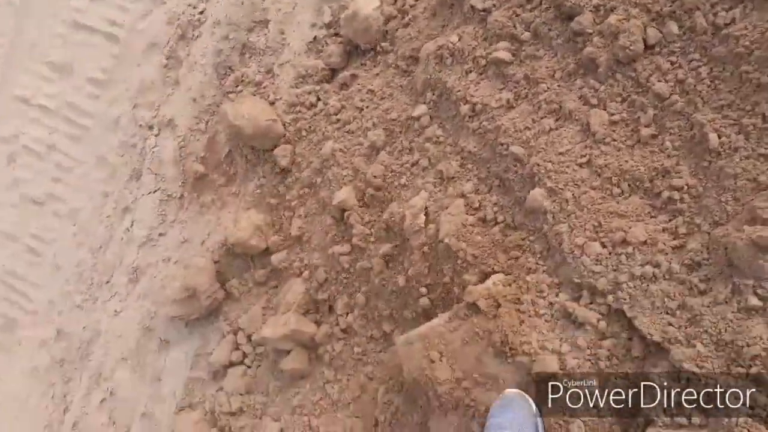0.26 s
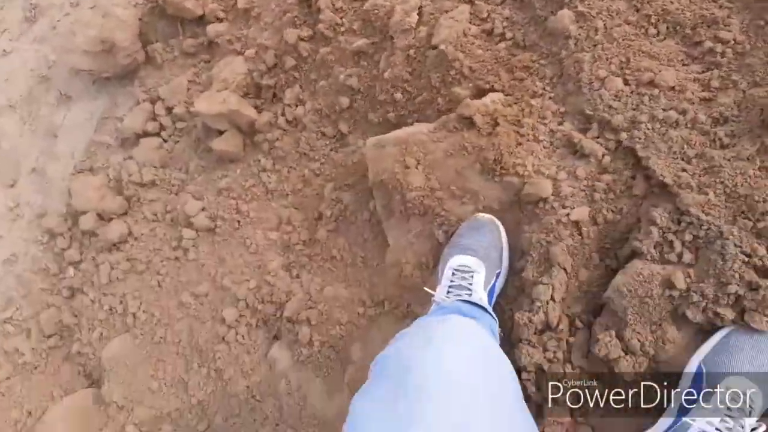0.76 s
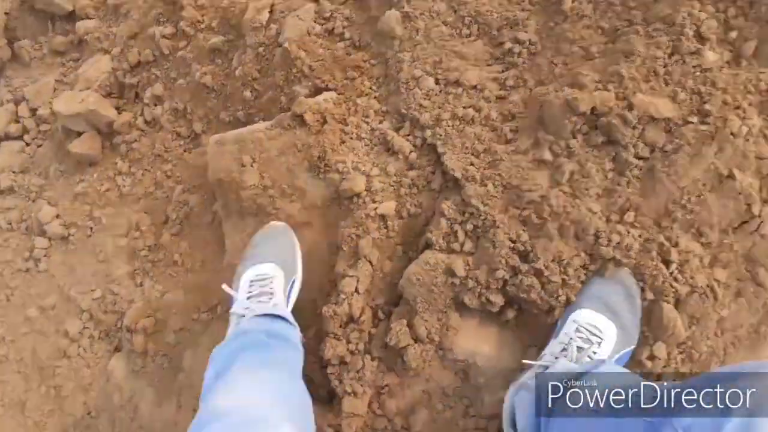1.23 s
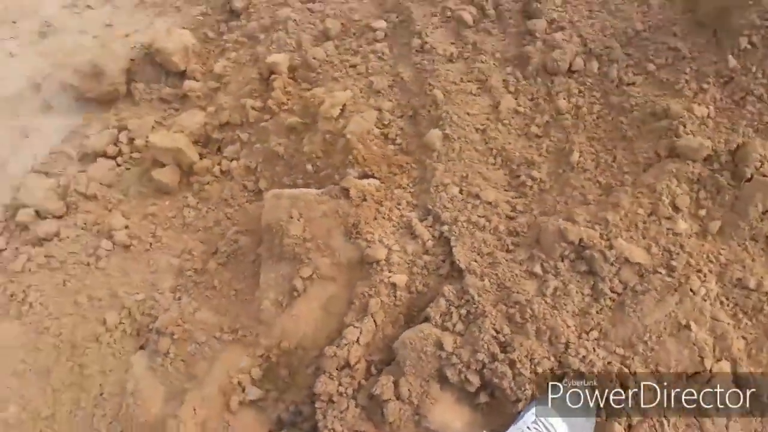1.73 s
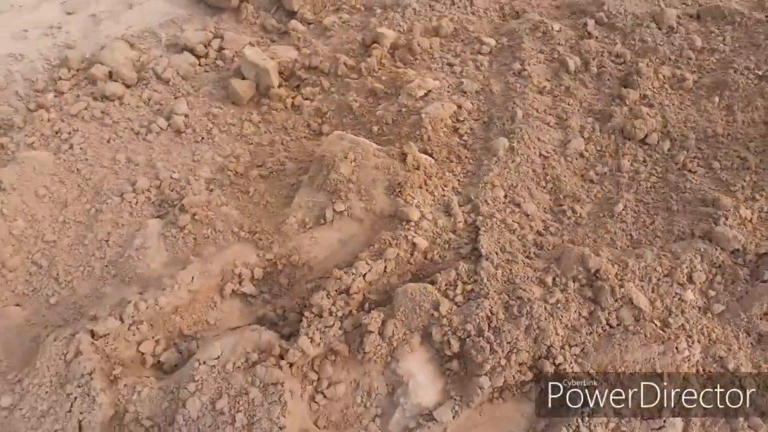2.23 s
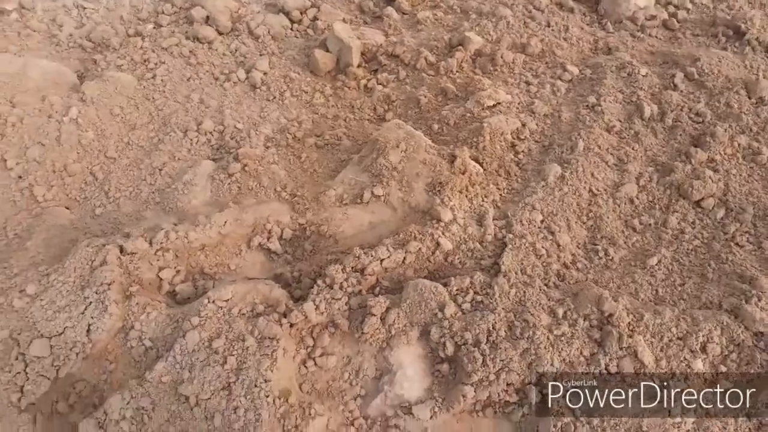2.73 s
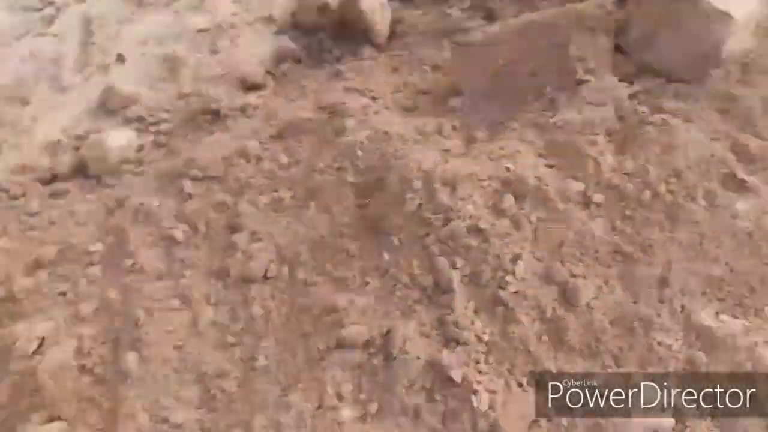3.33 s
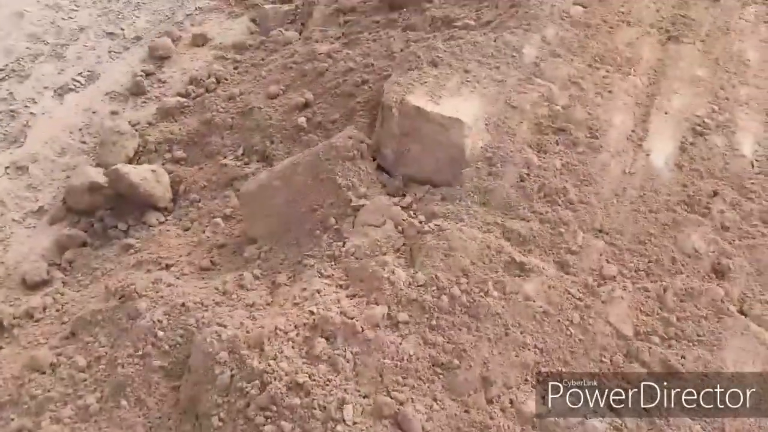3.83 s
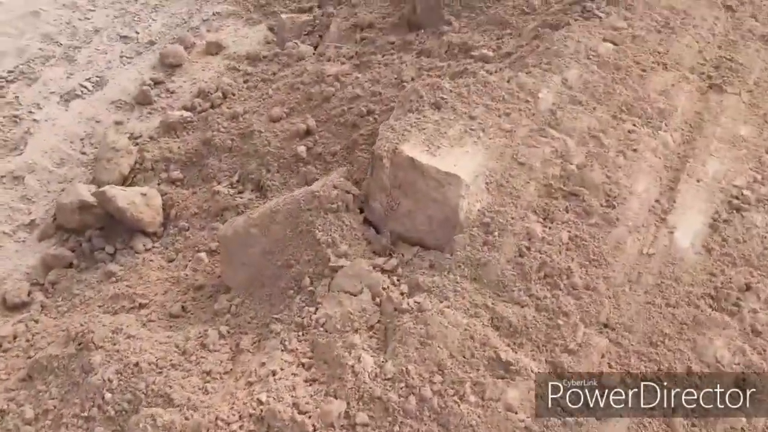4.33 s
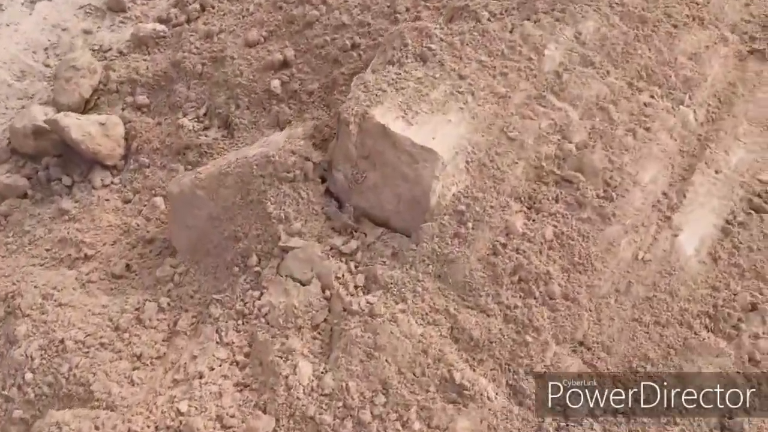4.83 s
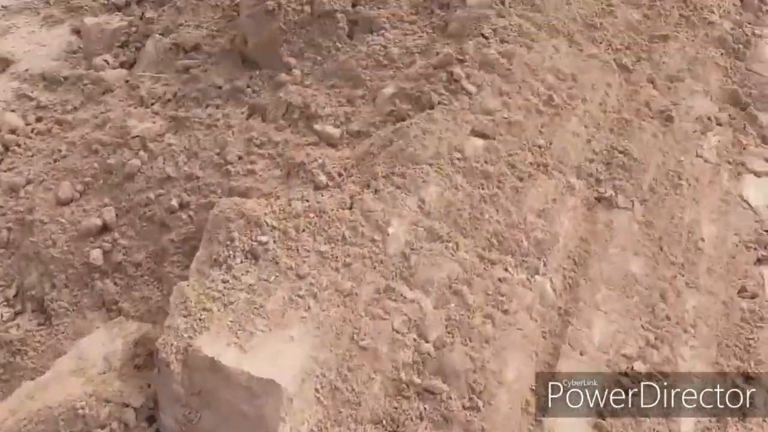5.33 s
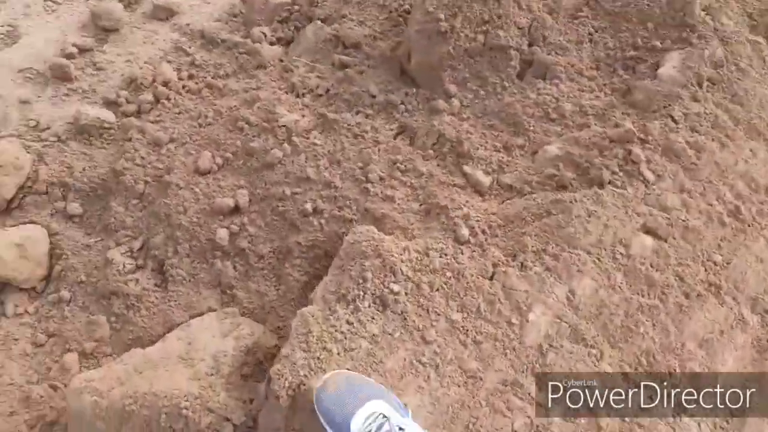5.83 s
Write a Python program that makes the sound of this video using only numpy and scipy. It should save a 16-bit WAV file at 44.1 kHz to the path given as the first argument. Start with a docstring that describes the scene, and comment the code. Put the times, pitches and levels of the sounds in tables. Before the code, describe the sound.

Outdoors, someone picks their way over loose, lumpy earth. Uneven soft steps crush clods with dull crunches, grit grinds and sand trickles off the shoes. Faint birdlike chirps rise in the distance, busiest at first. Wind buffets a handheld stereo microphone with low flutter, and a sharper crunchy step near five seconds leads into heavy wind thumps.

```python
"""Hiss and buffeting wind run throughout, with faint, mostly rising chirps and a trickle of sand,
while someone picks their way over loose, lumpy soil: each sole crushes clods with a dull crunch.
Crunch and grit are ringing grains, sand and hiss are coloured noise, and chirps are gliding husky whistles.
Gusts rumble and thump on the two microphone ports, a few clicks lie close by, and clods crack."""
import sys
import numpy as np
from scipy import signal
from scipy.fft import rfft, irfft, next_fast_len
from scipy.io import wavfile
from scipy.ndimage import uniform_filter1d

SR = 44100
rng = np.random.default_rng(int(sys.argv[2]) if len(sys.argv) > 2 else 0)


def unload_audio(sound):
    """Save the sound as a 16-bit wav file, at the path given as the first command line argument."""
    columns = np.transpose(np.atleast_2d(sound))
    # keep every value between -1 and 1, then stretch to whole-number steps
    steps = np.round(np.clip(columns, -1, 1) * 32767)
    wavfile.write(sys.argv[1], SR, steps.astype(np.int16))


N = 267629
TIME = np.arange(N) / SR


def from_db(db):
    """Decibels to gain."""
    return 10 ** (np.asarray(db) / 20)


def rms_one(x):
    """Scale to unit rms."""
    return x / np.sqrt(np.mean(x ** 2) + 1e-20)


def evened(x, window_s):
    """Hold the short-term rms near one."""
    window = int(window_s * SR)
    power = uniform_filter1d(x ** 2, window)
    power = uniform_filter1d(power, int(window_s * SR / 2))
    return x / np.sqrt(power + 1e-12)


def in_time(rows):
    """Each column of a curve at every sample."""
    s, *columns = np.transpose(rows)
    return [np.interp(TIME, s, column) for column in columns]


def swell(start_s, length_s, attack_s, release_s):
    """Smooth attack up to the start, a hold, then an exponential release."""
    before = np.minimum(TIME - start_s, 0) / attack_s
    after = np.maximum(TIME - start_s - length_s, 0) / release_s
    return np.exp(-before ** 2 / 2 - after)


def panned(pan_db):
    """Left and right gains, pan_db apart, whose mean is one."""
    gains = from_db(np.array([[pan_db], [-pan_db]]) / 2)
    return gains / gains.mean()


def colour(x, spectrum):
    """Filter by a spectrum of (freq_hz, level_db) points, falling away beyond both ends."""
    hz, level_db = np.transpose(spectrum)
    size = next_fast_len(N)
    log_hz = np.log(np.maximum(np.fft.rfftfreq(size, 1 / SR), 1))
    beyond = np.maximum(np.log(hz[0]) - log_hz, 0) + np.maximum(log_hz - np.log(hz[-1]), 0)
    gain = from_db(np.interp(log_hz, np.log(hz), level_db) - 20 * beyond)
    return irfft(rfft(x, size) * gain, size)[..., :N]


def drift(rate_hz):
    """Slow random wander with unit rms: noise at 400 points a second through two equal poles."""
    points_per_s = 400
    points = rng.standard_normal(int(N / SR * points_per_s) + 2)
    r = np.exp(-2 * np.pi * rate_hz / points_per_s)
    slow = signal.lfilter([1], [1, -2 * r, r * r], points)
    return np.interp(TIME * points_per_s, np.arange(len(slow)), rms_one(slow))


def grains(per_s, spread_db):
    """Random clicks: a positive spread makes a few large ones, a negative one a few small."""
    sizes = from_db(spread_db * np.minimum(rng.exponential(1, N), 4))
    signs = rng.choice([-1, 1], N)
    return rms_one(sizes * signs * (rng.random(N) < per_s / SR))


def ring(clicks, hz, t60_s):
    """A two-pole resonator: a unit click starts a decaying sine of height one."""
    r, w = from_db(-60 / (t60_s * SR)), 2 * np.pi * hz / SR
    return signal.lfilter([0, np.sin(w)], [1, -2 * r * np.cos(w), r * r], clicks + 1e-18)


def scattered(x, t60_s):
    """Rough ground returns a short diffuse tail, different at each port."""
    age = np.arange(int(t60_s * SR)) / SR
    tail = rng.standard_normal((2, len(age))) * from_db(-60 * age / t60_s)
    return signal.fftconvolve(x, tail / np.sqrt(np.sum(tail ** 2) / 2), axes=1)[:, :N]


# steady hiss at each port: (freq_hz, level_db per Hz)
HISS_LEFT = [(60, -104), (200, -91), (380, -104), (750, -108), (1500, -108), (2500, -112), (4000, -114),
             (6500, -124), (8300, -130), (15000, -130)]
HISS_RIGHT = [(60, -112), (200, -103), (380, -105.5), (750, -107), (1500, -110), (2300, -104), (3200, -105),
              (4200, -101), (6600, -101), (7600, -112), (8400, -126), (15000, -130)]
# extra bright hiss on the right, before its level curve: (freq_hz, level_db per Hz)
BRIGHT_HISS = [(1700, -122), (2350, -103), (2900, -116), (3500, -116), (3900, -102), (4300, -87.5),
               (4750, -89.5), (5200, -91), (6000, -100), (6800, -106), (8000, -130)]
# fader for the bright hiss: (time_s, level_db)
BRIGHT_HISS_LEVEL = [(5.39, -60), (5.41, -2.5), (5.53, -1), (5.61, -3.5), (5.75, -2.5), (5.82, -2.5),
                     (6.06, -1)]
# brief dips in the treble: (time_s, half_width_s, depth_db)
HISS_DIPS = [(0.78, 0.034, 11), (2.78, 0.073, 4.5), (3.4, 0.071, 2.5), (3.93, 0.062, 4.5)]


def air(dip_above_hz=3000):
    """Steady noise hiss that brightens on the right late on; its treble dips briefly now and then."""
    white = rng.standard_normal((3, N)) * np.sqrt(SR / 2)
    opened = from_db(in_time(BRIGHT_HISS_LEVEL)[0])
    flicker = rms_one(from_db(1.3 * drift(rate_hz=30)))
    left = colour(white[0], HISS_LEFT)
    right = colour(white[1], HISS_RIGHT) + opened * flicker * colour(white[2], BRIGHT_HISS)
    hiss = np.array([left, right])
    dip_db = sum(depth_db * np.exp(-((TIME - s) / half_width_s) ** 2 / 2)
                 for s, half_width_s, depth_db in HISS_DIPS)
    low = signal.sosfiltfilt(signal.butter(2, dip_above_hz, fs=SR, output="sos"), hiss)
    return low + (hiss - low) * from_db(-dip_db)


# strength of the breeze before each port's offset: (time_s, level_db)
BREEZE = [(0.0, -59), (0.43, -61), (0.54, -67.5), (1.45, -58), (1.54, -63.5), (2.76, -51.5), (3.0, -53.5),
          (3.04, -52), (3.4, -55), (4.6, -55), (4.63, -62.5), (4.84, -48.5), (5.27, -45), (5.38, -60),
          (5.72, -51.5), (6.05, -54)]
# gusts hit the ports: (start_s, length_s, left_rise_db, right_rise_db)
GUSTS = [(0.266, 0.24, 5, -9), (0.858, 0.03, 3, 8.5), (1.838, 0.019, 1, 10), (2.293, 0.022, 1, 1.5),
         (2.454, 0.05, 2.5, 10), (3.142, 0.24, 6.5, 8), (3.755, 0.015, -7, 3), (5.237, 0.028, 3, 4),
         (5.45, 0.13, 4, 23), (5.854, 0.036, -3, 19), (5.873, 0.16, 7.5, -3)]
# low wind rumble drops out at a port for a moment; a negative drop is a rise:
# (start_s, length_s, left_drop_db, right_drop_db)
DROPOUTS = [(0.036, 0.23, 1, 35), (0.343, 0.38, -1.5, 40), (0.88, 0.17, 20, 2.5), (1.546, 0.12, 15, -5.5),
            (2.22, 0.035, 20, 5), (2.349, 0.051, 28, -4.5), (2.508, 0.028, 33, 5.5),
            (2.825, 0.17, 11.5, -2.5), (3.261, 0.34, 50, 2), (3.684, 0.022, 19, 4), (3.873, 0.58, -1.5, 41),
            (4.499, 0.2, -2.5, 39), (4.754, 0.023, 24, -2), (4.84, 0.035, 10, -0.5),
            (4.965, 0.044, -1.5, 31), (5.084, 0.014, 18, 19), (5.177, 0.08, -3.5, 16.5),
            (5.336, 0.094, 2, -5.5)]
GUST_ATTACK_S, GUST_RELEASE_S, DROPOUT_EDGE_S = 0.028, 0.091, 0.0078


def pressure(left_db=5.5, right_db=5.0):
    """Wind level at the two ports in dB: the breeze, raised by gusts and lowered by dropouts."""
    level_db = in_time(BREEZE)[0] + np.array([[left_db], [right_db]])
    for start_s, length_s, *rise_db in GUSTS:
        level_db = level_db + np.outer(rise_db, swell(start_s, length_s, GUST_ATTACK_S, GUST_RELEASE_S))
    for start_s, length_s, *drop_db in DROPOUTS:
        level_db = level_db - np.outer(drop_db, swell(start_s, length_s, DROPOUT_EDGE_S, DROPOUT_EDGE_S))
    return level_db


# relative spectra of the low rumble and the higher eddies: (freq_hz, level_db per Hz)
WIND_RUMBLE = [(18, -16), (32, -15.5), (48, -4), (68, 2), (100, 0.5), (160, -8.5), (240, -19.5),
               (350, -26.5), (600, -60), (1200, -53)]
TURBULENCE = [(60, -19), (110, -18), (180, 7.5), (280, 3.5), (450, -13), (750, -26.5), (1400, -57),
              (3000, -51)]


def wind(level_db, rumble_db, eddy_db, eddy_growth, strong_db=-30, lumpy_db=3.0,
         gap_db=14.0, gap_rarity=0.46, rumble_limit_db=-27):
    """Lumpy rumble on one port; in strong gusts it levels off and smaller, higher eddies join."""
    rumble = evened(colour(rng.standard_normal(N), WIND_RUMBLE), window_s=0.016)
    lumps = from_db(rumble_db + lumpy_db * drift(rate_hz=29.7))
    eddies = evened(colour(grains(per_s=600, spread_db=4.0), TURBULENCE), window_s=0.049)
    # random short gaps, deepest when the wind level is low
    gap_depth = np.clip((strong_db - level_db) / 10, 0, 1)
    gaps = np.clip(2 * (drift(rate_hz=13.1) - gap_rarity), 0, 1) * gap_depth
    force, limit = from_db(level_db - gap_db * gaps), from_db(rumble_limit_db)
    limited_rumble = limit * np.tanh(force * lumps / limit) * rumble
    eddy_gain = from_db(eddy_db + eddy_growth * (level_db - strong_db))
    return limited_rumble + force * eddy_gain * eddies


# relative spectrum of the dull rush: (freq_hz, level_db per Hz)
DULL_RUSH = [(150, -33), (280, 4.5), (390, -3), (500, -5.5), (750, -17), (1200, -44)]


def dull_rush(port_db, level_db=-24.0, follow=0.69, settle_s=0.12, breeze_db=-45):
    """A faint dull rush on both ports that follows the stronger port's wind level."""
    strongest_db = uniform_filter1d(port_db.max(axis=0), int(settle_s * SR))
    flow_db = breeze_db + follow * (strongest_db - breeze_db)
    return from_db(level_db + flow_db) * rms_one(colour(rng.standard_normal((2, N)), DULL_RUSH))


# spells of fainter, overlapping chirps: (start_s, end_s, level_db)
CHORUS = [(0.0, 0.75, -74), (1.0, 1.43, -73), (1.56, 1.68, -68), (1.7, 2.0, -73)]
CLIMB_HZ_PER_S = 12900


def chorus(per_s=55, low_hz=3000, high_hz=4600, length_s=0.029):
    """Random faint calls that all climb at one rate, as rows like those of CHIRPS."""
    rows = []
    for start_s, end_s, level_db in CHORUS:
        count = int(per_s * (end_s - start_s))
        for when, pitch, size in rng.random((60, 3))[:count]:
            call_s = start_s + when * (end_s - start_s)
            call_length_s = length_s * (.5 + size)
            hz = low_hz * (high_hz / low_hz) ** pitch
            rows.append((call_s, call_length_s, hz, hz + CLIMB_HZ_PER_S * call_length_s, level_db))
    return rows


# distant chirps, most of them rising: (start_s, length_s, start_hz, end_hz, level_db)
CHIRPS = [(-0.03, 0.11, 3390, 3460, -60), (0.065, .04, 3450, 3620, -60), (0.02, 0.038, 3900, 4860, -73),
          (0.092, 0.054, 4880, 5150, -66), (0.125, 0.032, 3050, 2880, -68), (0.188, 0.052, 2950, 3610, -66),
          (0.245, 0.084, 5790, 5670, -67.5), (0.29, 0.098, 5590, 5450, -68.5),
          (0.255, .035, 4800, 4880, -71), (0.303, 0.028, 3430, 3500, -55.5), (0.29, 0.1, 3770, 3700, -69),
          (0.32, .03, 3750, 4250, -78), (0.355, 0.051, 3150, 3730, -64), (0.405, 0.077, 2880, 3700, -61),
          (0.485, 0.029, 2100, 2500, -72), (0.53, 0.12, 3480, 3480, -69.5), (0.645, 0.04, 3700, 4750, -68),
          (0.655, .035, 2150, 2470, -74), (0.675, 0.056, 2650, 3300, -71.5),
          (0.722, 0.043, 4250, 4830, -71), (0.75, .03, 4770, 4840, -69), (0.835, 0.071, 2180, 2420, -69.5),
          (0.905, 0.028, 4500, 5240, -67.5), (0.93, 0.089, 3640, 3770, -69),
          (1.12, 0.045, 3000, 3570, -60.5), (1.195, 0.041, 2050, 2540, -68.5),
          (1.21, 0.026, 2950, 3650, -61), (1.315, 0.034, 2560, 2550, -64.5), (1.355, .05, 3200, 3690, -73),
          (1.372, 0.053, 4200, 4650, -68), (1.535, 0.11, 2920, 3760, -72), (1.598, 0.055, 4170, 4780, -64),
          (1.672, 0.022, 3830, 4350, -65.5), (1.685, .03, 2280, 2330, -71.5),
          (1.708, 0.048, 3040, 3580, -62), (1.735, 0.028, 4250, 4560, -66), (1.765, 0.018, 4300, 4900, -66),
          (1.78, 0.035, 2360, 2410, -62.5), (1.808, 0.044, 2850, 3200, -63),
          (1.843, 0.035, 3250, 3740, -58.5), (1.93, 0.063, 2890, 3100, -71),
          (1.969, 0.071, 2100, 2580, -65), (1.965, 0.045, 4200, 4650, -72), (2.035, 0.075, 3160, 3720, -63),
          (2.07, 0.06, 3710, 3780, -55), (2.44, 0.053, 3040, 3660, -71), (2.478, 0.019, 2000, 2450, -70),
          (2.51, 0.036, 2840, 3720, -76), (2.535, 0.056, 2080, 2650, -68), (2.565, 0.07, 2740, 3380, -51.5),
          (2.55, 0.041, 4300, 4780, -62), (2.825, 0.04, 4040, 3930, -68), (2.85, 0.044, 3970, 4700, -69),
          (2.848, 0.044, 2110, 2480, -70), (2.892, 0.05, 3000, 3830, -68), (2.995, 0.037, 2100, 2430, -69),
          (3.036, 0.054, 3200, 3620, -60.5), (3.082, 0.041, 4710, 4830, -64.5),
          (3.158, 0.09, 2640, 3340, -56.5), (3.295, 0.077, 3770, 4160, -71), (3.36, 0.11, 4080, 3900, -71),
          (3.46, 0.085, 3200, 2660, -72), (3.775, 0.13, 2846, 2950, -57.5),
          (3.843, 0.077, 2520, 3230, -53.5), (3.835, 0.046, 4370, 4730, -68.5),
          (3.885, 0.073, 4660, 4970, -70.5), (3.93, .075, 2920, 2880, -72), (4.515, 0.11, 2420, 3370, -65),
          (5.205, 0.09, 2370, 3280, -55.5), (5.4, 0.037, 2150, 2390, -68), (5.42, 0.056, 2950, 3720, -57.5),
          (5.462, 0.045, 3220, 3670, -61), (5.401, 0.054, 4630, 4750, -65),
          (5.484, 0.058, 4640, 4770, -62.5), (5.49, 0.051, 2200, 2650, -67),
          (5.655, 0.068, 2100, 2500, -74), (5.81, 0.07, 2140, 2580, -67), (5.85, 0.14, 3100, 4300, -66.5),
          (5.96, 0.04, 2090, 2580, -67), (5.988, 0.032, 2870, 3320, -56)]
# callers by pitch sit in different directions: (pitch_hz, right_port_lag_s)
CALLER_LAG = [(2350, 0.000037), (2850, 0.00014), (3400, 0.00011), (4500, 0.000014)]
HUSK_DB, HUSK_HZ = -15, 240  # breathy noise before each call's huskiness: level, half width
NEAR_CALL_DB, BLUR_PER_DB = -59, 1.1  # fainter calls are farther off: dB more husk per dB fainter


def chirps(pan_db=-1.0, waver_hz=30, bend=1.3, late_swell=1.12, scatter_db=-14):
    """Gliding whistles that peak near mid-call; steep glides and far callers sound huskier."""
    out = np.zeros((2, N))
    waver = waver_hz * drift(rate_hz=136)
    flutter = rms_one(from_db(2 * drift(rate_hz=70)))
    noise = rng.standard_normal((2, N)) + 1j * rng.standard_normal((2, N))
    haze = signal.sosfilt(signal.butter(2, HUSK_HZ, fs=SR, output="sos"), noise)
    haze = from_db(HUSK_DB) * haze / np.std(haze)
    for start_s, length_s, start_hz, end_hz, level_db in list(CHIRPS) + chorus():
        during = (TIME >= start_s) & (TIME < start_s + length_s)
        progress = (TIME[during] - start_s) / length_s
        hz = start_hz + (end_hz - start_hz) * progress ** bend + waver[during]
        lag_s = np.interp((start_hz + end_hz) / 2, *np.transpose(CALLER_LAG))
        turns = np.cumsum(hz) / SR - np.outer([0, lag_s], hz)
        steepness = np.clip(2 * abs(end_hz - start_hz) / length_s / CLIMB_HZ_PER_S, .3, 2)
        blur = from_db(BLUR_PER_DB * np.clip(NEAR_CALL_DB - level_db, 0, 10))
        husky = steepness * blur
        voice = (1 + husky * haze[:, during]) / np.hypot(1, husky * from_db(HUSK_DB))
        loudness = np.abs(np.sin(np.pi * progress ** late_swell)) ** .75
        whistle = np.sqrt(2) * np.imag(voice * np.exp(2j * np.pi * turns))
        out[:, during] += from_db(level_db) * loudness * whistle
    direct = panned(pan_db) * out * flutter
    return direct + from_db(scatter_db) * scattered(direct, t60_s=.3)


# sand slides from a shoe, levels before trims: (start_s, length_s, left_level_db, left_minus_right_db)
SLIDES = [(0.0, 0.21, -71, -4), (0.295, 0.15, -76, 6), (0.497, 0.029, -68.5, 7), (0.924, .02, -66.5, 6),
          (1.028, 0.055, -69.5, 1), (1.144, 0.23, -63.5, 3), (1.414, 0.41, -74, 14), (1.905, 0.16, -65, 11),
          (2.142, .18, -80, -2), (2.39, 0.053, -66, 13), (2.535, 0.094, -74, 15), (3.053, 0.041, -72, 8),
          (3.546, 0.086, -73.5, 17), (4.196, 0.031, -68.5, 14), (4.322, 0.37, -68.5, 15),
          (4.755, 0.23, -73, 5), (5.033, 0.28, -63.5, 7), (5.4, 0.5, -69, 22)]
# relative spectra of the rustle and the fine hiss of sand: (freq_hz, level_db per Hz)
RUSTLE = [(900, 0), (2000, 1.5), (3200, -0.5), (4500, 0.5), (6500, -1), (7400, -2), (8200, -10.5)]
FINE_SAND = [(7000, -4), (8400, -16.5), (9200, -1.5), (11500, -2), (14500, -3.5), (16000, -11)]
# a faint trickle never stops: one value for each port, left_db and right_db
TRICKLE_DB = (-81.5, -85)
SLIDE_ATTACK_S, SLIDE_RELEASE_S = 0.025, 0.068


def sand(rustle_left_db=0.5, rustle_right_db=0.0, fine_db=-4.0, fine_follow=0.9,
         full_flow_db=-72, uneven_db=2.5):
    """Countless tiny grains slide; the flow drives a rustle and, more gently, a fine hiss."""
    power = np.zeros((2, N))
    for start_s, length_s, level_db, pan_db in SLIDES:
        port_gain = from_db([[level_db], [level_db - pan_db]])
        power += (port_gain * swell(start_s, length_s, SLIDE_ATTACK_S, SLIDE_RELEASE_S)) ** 2
    flow = np.sqrt(power)
    coarse = np.array([rms_one(colour(grains(per_s=9000, spread_db=5.0), RUSTLE)) for port in range(2)])
    fine = np.array([rms_one(colour(grains(per_s=16000, spread_db=3.5), FINE_SAND)) for port in range(2)])
    # the rustle follows the left flow on both ports
    unevenness = from_db(uneven_db * drift(rate_hz=8.9))
    rustle = flow[0] * unevenness * from_db([[rustle_left_db], [rustle_right_db]])
    hiss = from_db(full_flow_db + fine_db) * (flow / from_db(full_flow_db)) ** fine_follow
    return coarse * rustle + fine * np.hypot(hiss, from_db(TRICKLE_DB)[:, None])


# small hard contacts; level scales the mix of ring, body and edge:
# (time_s, level_db, left_minus_right_db, pitch_hz, sharp_edge_db)
CLICKS = [(0.047, -44, -16, 805, 3), (0.100, -51, 18, 1240, -16), (0.161, -59, 12, 646, -1),
          (0.185, -51, 8, 1160, -18), (0.407, -60, 5, 620, 7), (0.481, -50.5, 7, 950, -14),
          (0.78, -55.5, -13, 1980, 10.5), (1.771, -53, -1, 553, -10), (2.363, -47, 8, 600, -20),
          (6.053, -29, -3, 1120, -8.5)]


def clicks(ring_db=3.0, ring_cycles=7.5, body_db=9.5, body_hz=230, body_t60_s=0.0044,
           edge_hz=2800, top_hz=6400):
    """Each contact is a sharp edge, a dead ring and a short low knock; soft soil dulls the top."""
    out = np.zeros((2, N))
    edge_band = signal.butter(2, [edge_hz, 2 * edge_hz], "band", fs=SR, output="sos")
    for s, level_db, pan_db, hz, edge_db in CLICKS:
        tap = signal.unit_impulse(N, min(round(s * SR), N - 1))
        edge = signal.sosfilt(edge_band, tap + 1e-18)
        sound = from_db(ring_db) * ring(tap, hz, ring_cycles / hz)
        sound += from_db(body_db) * ring(tap, body_hz, body_t60_s)
        sound += from_db(edge_db) * edge / edge.max()
        out += from_db(level_db) * panned(pan_db) * sound
    return signal.sosfilt(signal.butter(6, top_hz, fs=SR, output="sos"), out + 1e-18)


def fractures(spectrum, per_s, spread_db, apart, cycles, count=12):
    """Crumbs of many sizes snap and ring for a few cycles; the ports share many of the grains."""
    points_hz, points_db = np.transpose(spectrum)
    shared = grains(per_s, spread_db)
    snaps = shared + apart * np.array([grains(per_s, spread_db), grains(per_s, spread_db)])
    sizes = rng.integers(0, count, N)
    out = np.zeros((2, N))
    for k, hz in enumerate(np.geomspace(points_hz[0], points_hz[-1], count)):
        level_db = np.interp(np.log(hz), np.log(points_hz), points_db)
        strength = from_db(level_db) * hz  # higher rings are briefer
        out += strength * ring(snaps * (sizes == k), hz, cycles / hz)
    return evened(out, window_s=.025)


# one row per step, levels before the crunch and grit trims: (full_weight_s, rise_s, decay_s, crunch_db,
# grit_db, heel_lead_s, heel_against_sole_db, settling_crumbs_db)
STEPS = [(0.17, 0.028, 0.096, -72, -90, 0.077, -6, -74), (0.487, 0.011, 0.045, -68.5, -79, 0.077, 5, -106),
         (0.945, 0.012, 0.045, -83, -73, 0.022, -15, -99), (1.16, 0.02, 0.048, -61, -75, 0.024, -5, -66),
         (1.92, 0.1, 0.42, -70, -72, 0.065, 7.5, -92), (2.412, 0.021, 0.029, -55, -65, 0.053, -16, -71.5),
         (3.087, 0.029, 0.026, -77, -61, 0.056, -12, -64),
         (4.197, 0.011, 0.01, -60.5, -58.5, 0.08, -25, -67),
         (5.068, 0.0086, 0.013, -58.5, -52, 0.025, -11, -62)]
# relative spectra of breaking clods and grinding grit: (freq_hz, level_db)
CRUNCH = [(260, -4), (400, 6), (540, -3), (850, -9.5), (1200, -5.5), (1700, -41)]
GRIT = [(850, -17), (1250, -6.5), (1650, -5.5), (2300, -16.5), (3000, -13)]
HEEL_RISE_S, HEEL_DECAY_S = 0.0034, 0.027
# crumbs give way behind the sole; their crunch is set against their grit
SETTLE_AFTER_S, SETTLE_RISE_S, SETTLE_DECAY_S, SETTLE_CRUNCH_DB = 0.022, 0.035, 0.18, -7.5


def footsteps(crunch_db=4.0, grit_db=-3.5):
    """Heel, then weight: clods collapse dully, grit grinds beneath them, and crumbs settle."""
    crunch, grit = np.zeros((2, N))
    for s, rise_s, decay_s, clod_db, crumb_db, lead_s, heel_db, settle_db in STEPS:
        sole = swell(s, 0, rise_s, decay_s)
        heel = from_db(heel_db) * swell(s - lead_s, 0, HEEL_RISE_S, HEEL_DECAY_S)
        load = sole + heel
        settling = from_db(settle_db) * swell(s + SETTLE_AFTER_S, 0, SETTLE_RISE_S, SETTLE_DECAY_S)
        crunch += from_db(clod_db) * load + from_db(SETTLE_CRUNCH_DB) * settling
        grit += from_db(crumb_db) * load + settling
    breaking = fractures(CRUNCH, per_s=1600, spread_db=3.0, apart=0.62, cycles=9.6)
    grinding = fractures(GRIT, per_s=3000, spread_db=3.4, apart=.55, cycles=8.0)
    clods = from_db(crunch_db) * crunch * breaking
    crumbs = from_db(grit_db) * grit * grinding
    clumps = rms_one(from_db(2 * drift(rate_hz=60)))
    return clumps * (clods + crumbs)


# single low thuds, swing level before the trim: (time_s, swing_db, left_minus_right_db, pitch_hz, snap_db)
THUDS = [(0.29, -45, 19, 69, -75), (0.385, -53, 28, 85, -75), (1.101, -41, 3, 64.4, -72),
         (1.326, -41.5, 0, 84, -53), (1.394, -38, 7, 64, -58), (1.447, -47.5, -1, 72, -73),
         (2.304, -39, -8, 89, -68), (2.364, -42, -26, 133, -51), (2.409, -40, -25, 93, -66),
         (2.464, -38, 5, 166, -47), (2.566, -39.5, 15, 151, -53), (2.592, -40.5, 2, 161, -51),
         (2.68, -36.5, 1, 119, -61), (2.769, -35.5, -14, 110, -79), (3.045, -26, -2, 100, -53),
         (3.105, -38, -6, 126, -68), (3.17, -26, 1, 160, -55), (3.221, -45, 16, 215, -45.5),
         (3.608, -40, -31, 104, -75), (3.652, -42, -21, 99, -70), (3.751, -34.5, 11, 89.5, -72),
         (3.922, -38, 13, 94, -70), (4.198, -33, 30, 88, -62), (4.289, -40.5, 21, 75, -70),
         (4.578, -39.5, 29, 116, -54), (4.73, -42.5, 22, 108, -64), (4.801, -33.5, -4, 117, -62),
         (4.822, -31.5, -1, 99, -66), (5.049, -32, 2, 104, -42), (5.063, -29.5, -7, 133, -43),
         (5.148, -34, -7, 124, -51), (5.254, -31, 23, 132, -49), (5.283, -29, 11, 172, -49),
         (5.439, -22, -21, 104, -66), (5.466, -22.5, -24, 96, -37.5), (5.488, -25.5, 22, 101, -55),
         (5.533, -20, -18, 89.4, -44), (5.555, -29, -27, 233, -50), (5.579, -27.5, -37, 92, -41),
         (5.599, -26.5, -37, 145, -38), (5.702, -33.5, -29, 152, -65), (5.784, -30.5, -10, 108, -62),
         (5.831, -44, -25, 211, -60), (5.865, -24, -37, 165, -37.5)]


def thuds(level_db=-3.5, cycles=0.66, snap_gain_db=0.0, snap_hz=480, snap_t60_s=0.015):
    """A puff of air snaps at the membranes and swings them for a cycle or two."""
    out = np.zeros((2, N))
    for s, swing_db, pan_db, hz, snap_db in THUDS:
        near = np.abs(TIME - s) < .06
        turns = (TIME[near] - s - .003) * hz
        swing = np.cos(2 * np.pi * (turns + rng.random())) * np.exp(-(turns / cycles) ** 2 / 2)
        snap = ring(signal.unit_impulse(len(turns), "mid"), snap_hz, snap_t60_s)
        puff = from_db(swing_db + level_db) * swing + from_db(snap_db + snap_gain_db) * snap
        out[:, near] += panned(pan_db) * puff
    return out


# larger clods burst under a sole: (start_s, peak_db, pitch_hz)
BURSTS = [(0.412, -51, 423), (1.133, -64, 900), (1.143, -49, 714), (1.158, -45.5, 734), (1.17, -58, 850),
          (1.19, -59, 695), (1.837, -55, 696), (1.85, -60, 640), (1.94, -48.5, 950), (1.949, -53, 1010),
          (2.016, -52, 1100), (2.368, -51, 666), (2.384, -50, 945), (2.394, -52, 1040), (2.398, -53, 740),
          (2.409, -47, 950), (2.421, -54, 1400), (2.434, -53, 1000), (3.083, -51, 1400), (3.093, -53, 990),
          (3.117, -49.5, 960), (4.184, -60, 1210), (4.189, -50, 393), (4.195, -59, 1200),
          (5.046, -42, 1200), (5.064, -38, 1390), (5.073, -37.5, 1000), (5.08, -50, 900),
          (5.094, -47, 1200), (5.116, -51, 1600), (5.146, -53, 1650), (5.167, -66, 1100)]
CRACK_GAP_S, CRACK_LOSS_DB = 0.001826, 5.5  # mean gap between cracks, and how much weaker each one is


def bursts(level_db=0.0, below=0.41, above=1.21, count=4):
    """A larger clod gives way in a quick run of dead cracks, muffled by the soil around it."""
    out = np.zeros(N)
    for s, peak_db, hz in BURSTS:
        cracks = np.zeros(SR // 20)
        gaps_s = CRACK_GAP_S * rng.uniform(.5, 1.5, count)
        places = ((np.cumsum(gaps_s) - gaps_s[0]) * SR).astype(int)
        cracks[places] = from_db(-CRACK_LOSS_DB * np.arange(count)) * rng.choice([-1, 1], count)
        band = signal.butter(3, [below * hz, above * hz], "band", fs=SR, output="sos")
        sound = signal.sosfilt(band, cracks)
        start = round(s * SR)
        out[start:start + len(sound)] += from_db(peak_db + level_db) * sound / np.abs(sound).max()
    return out


# one shoe scuffs through fine dust: start_s, length_s
SCUFF = (0.5, 0.07)
# relative spectrum of that dust: (freq_hz, level_db per Hz)
DUST = [(7500, -5), (9200, 12), (11000, -26), (13000, -22)]


def scuff(level_db=-74, pan_db=21, attack_s=0.021, release_s=0.041):
    """A sole skids briefly on dry dust: dense grains make a thin, high hiss."""
    start_s, length_s = SCUFF
    dust = np.array([rms_one(colour(grains(per_s=14000, spread_db=11.0), DUST)) for port in range(2)])
    return from_db(level_db) * panned(pan_db) * swell(start_s, length_s, attack_s, release_s) * dust


# a sole drags over crumbs: (start_s, length_s, level_db)
DRAGS = [(1.247, 0.18, -72.5), (3.168, 0.057, -79), (4.12, 0.13, -70), (5.036, 0.01, -63),
         (5.07, 0.076, -61)]
# relative spectrum of that dragging: (freq_hz, level_db per Hz)
DRAG = [(800, -21), (1200, 2), (1600, 2), (2200, -2.5), (2800, -9.5)]


def drags(attack_s=0.0033, release_s=0.053, apart=0.62):
    """The sole drags a little way, rolling dry crumbs beneath it."""
    shared = grains(per_s=1800, spread_db=-3.0)
    separate = np.array([grains(per_s=1700, spread_db=-13.0) for port in range(2)])
    grinding = shared + apart * separate
    load = sum(from_db(level_db) * swell(start_s, length_s, attack_s, release_s)
               for start_s, length_s, level_db in DRAGS)
    return load * rms_one(colour(grinding, DRAG))


def scene():
    """Hiss and wind on the ports, chirps far off, steps and sand below."""
    port_db = pressure()
    left = wind(port_db[0], rumble_db=-2.0, eddy_db=-11.5, eddy_growth=0.87)
    right = wind(port_db[1], rumble_db=0.0, eddy_db=-6.0, eddy_growth=0.36)
    weather = air() + np.array([left, right]) + dull_rush(port_db) + thuds()
    ground = sand() + footsteps() + bursts() + scuff() + drags()
    return weather + chirps() + clicks() + ground


MIC_LOW_CUT_HZ, CUTOFF_HZ = 29, 15500


def record(dry):
    """The microphones lose the deepest bass; the top is cut steeply."""
    low_cut = signal.butter(2, MIC_LOW_CUT_HZ, "high", fs=SR, output="sos")
    top_cut = signal.ellip(10, .1, 70, CUTOFF_HZ, fs=SR, output="sos")
    return signal.sosfilt(top_cut, signal.sosfilt(low_cut, dry))


dry = scene()
out = record(dry)
unload_audio(out)
```